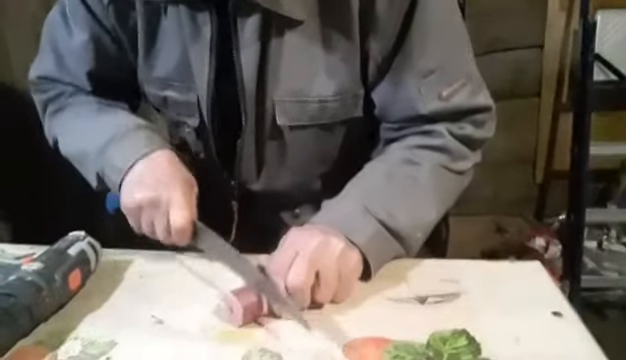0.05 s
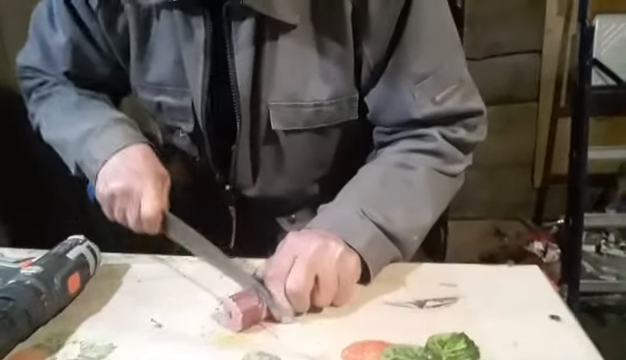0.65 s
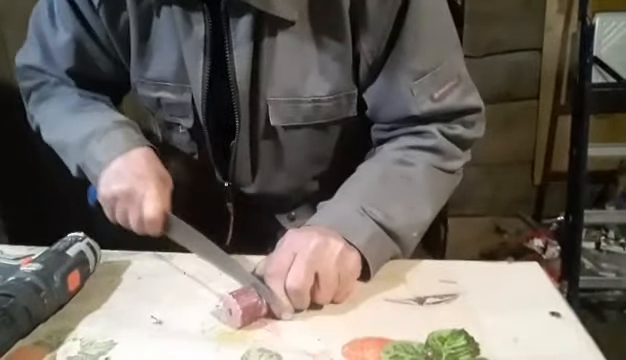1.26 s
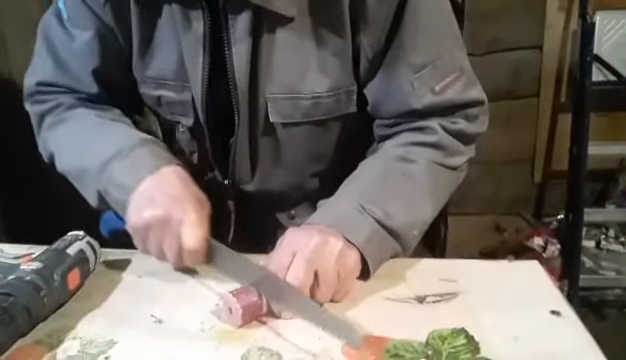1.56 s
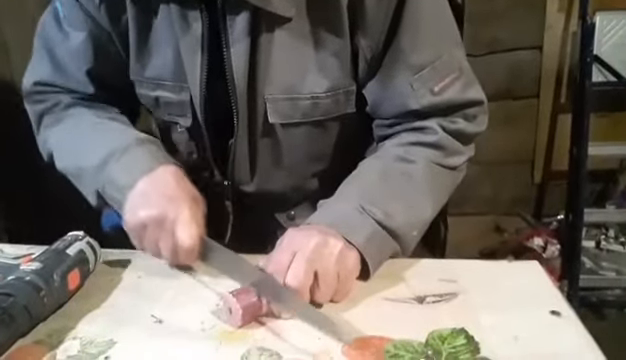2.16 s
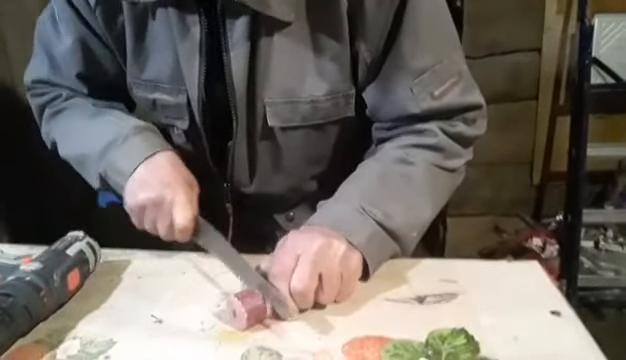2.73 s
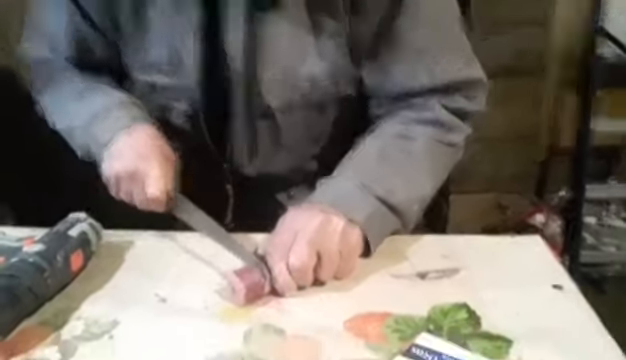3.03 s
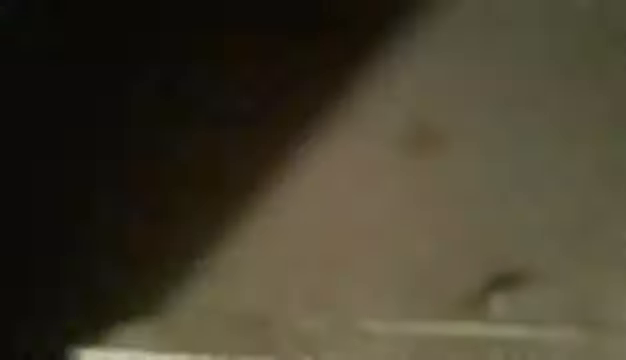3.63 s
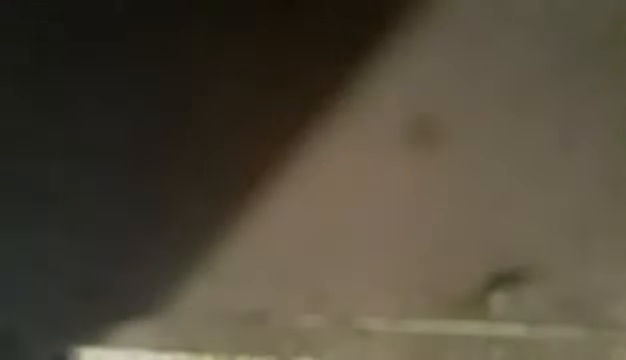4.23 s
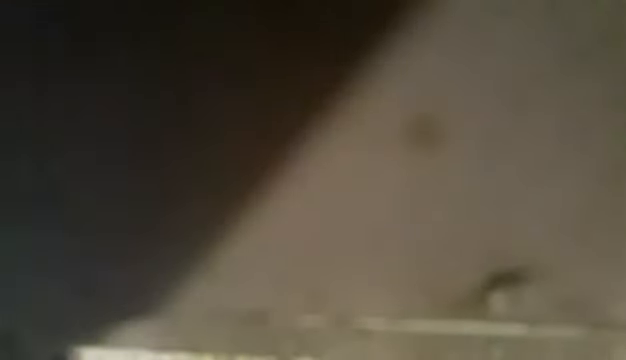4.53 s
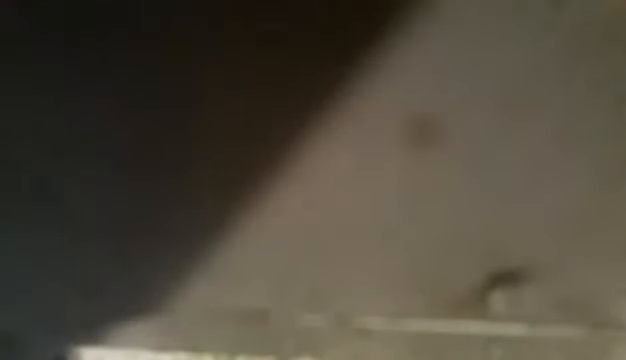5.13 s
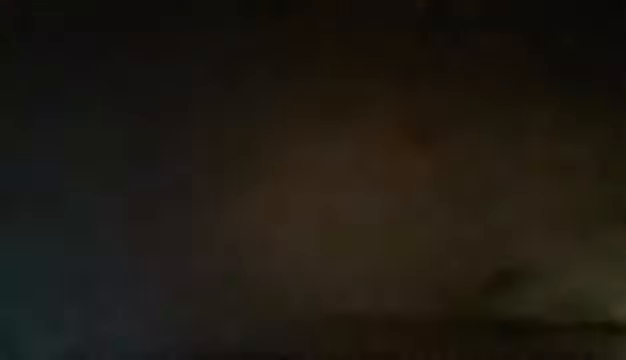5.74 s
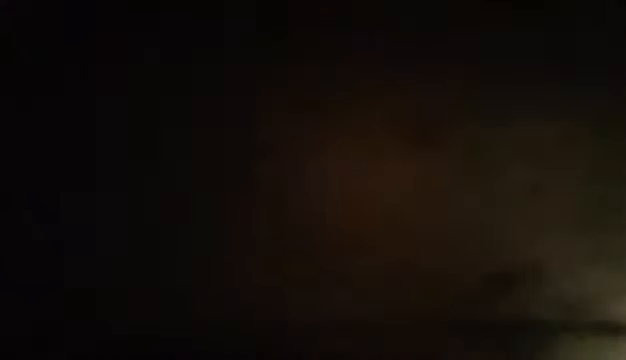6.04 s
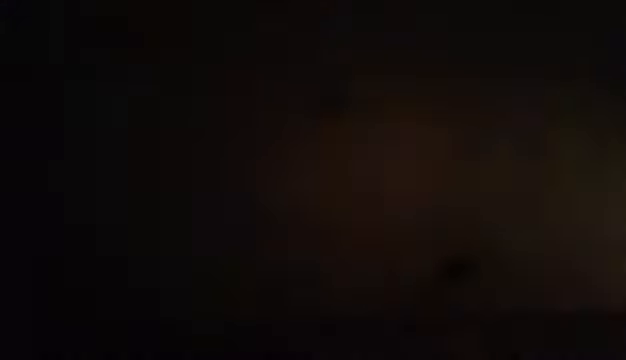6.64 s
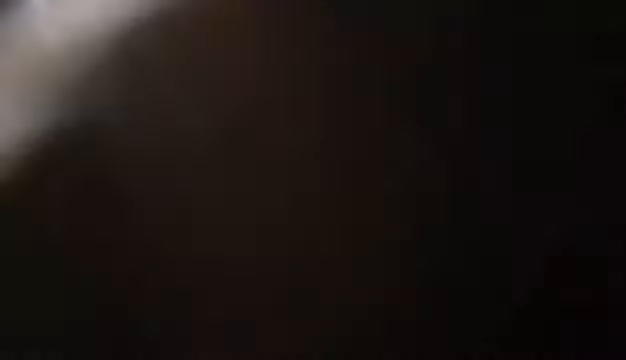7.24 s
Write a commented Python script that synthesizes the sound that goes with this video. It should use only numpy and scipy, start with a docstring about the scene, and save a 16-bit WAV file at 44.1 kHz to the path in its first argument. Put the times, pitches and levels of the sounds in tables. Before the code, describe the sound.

From the start, a serrated knife saws back and forth through a hard, crumbly block on a workbench, about three strokes a second, heard at arm's length in a small shed. Each stroke has a gritty rasp and a thin metallic zing; the pushes drum the bench top, and the blade sometimes snags with a short crunch. The sawing eases near 3 seconds, then gives one more firm stroke. At about 3.7 seconds a phone topples with a loud burst of plastic clacks and wooden thuds right at the microphone, then slides to rest by about 4.3 seconds. A few light taps follow, and a cluster of louder handling knocks comes between 5.1 and 5.7 seconds. From about 6.2 seconds, fingers rub dryly over the case with small bumps and soft sleeve rustle, fading by about 7.4 seconds. The background is very quiet.

```python
"""A workbench in a small shed: a serrated knife saws back and forth through a hard cake of bait.
The teeth crush grit, ring the blade and drum the bench top, hardest on the push. A phone standing on the
bench topples, clatters and slides to rest; then fingers knock and rub on its case as it is picked up.
Sleeves rustle softly over still air."""
import sys
import numpy as np
from scipy import signal
from scipy.fft import rfft, irfft
from scipy.io import wavfile
from scipy.ndimage import uniform_filter1d, map_coordinates

SR = 44100
rng = np.random.default_rng(int(sys.argv[2]) if len(sys.argv) > 2 else 0)


def generate_wav(signal):
    """Clip the signal to [-1, 1] and save it as 16-bit WAV at the path in sys.argv[1]."""
    frames = np.transpose(np.atleast_2d(signal))
    scaled = np.clip(frames, -1, 1) * 32767
    pcm = np.round(scaled).astype(np.int16)
    wavfile.write(sys.argv[1], SR, pcm)


N = 329868
T = np.arange(N) / SR

# Knife strokes, mostly alternating pull and push, with one small resettling move near 3 s:
# (start [s], full-speed tooth rate [Hz], drum level [dB], rasp level [dB],
# bite delay [s], bite half-length [s], bite boost [dB])
STROKES = [(0.102, 218.2, -48.5, -45, 0.058, 0.01, 18.5), (0.184, 281.6, -33, -33.5, 0.25, 0.055, 13),
           (0.522, 277.1, -35.5, -27.5, 0.062, 0.083, 7), (0.867, 278.5, -22.5, -28.5, 0.2, 0.047, 8),
           (1.2, 279.8, -36.5, -28.5, .065, 0.071, 13.5), (1.541, 304.8, -19.5, -28, 0.38, 0.041, -1),
           (1.845, 289, -36, -28.5, .07, .06, 3.5), (2.166, 310.8, -21, -28.5, 0.19, .045, 10.5),
           (2.462, 279.3, -43, -30.5, 0.037, 0.11, 14), (2.806, 279.2, -51, -39, .072, 0.041, 22),
           (3.032, 198.2, -54.5, -60, 0.069, .014, 13.5), (3.141, 218.9, -46, -37.5, .115, 0.012, 8.5),
           (3.329, 314.2, -28.5, -30, 0.27, 0.084, 15.5)]


def blade_motion():
    """The blade speeds up and slows in each stroke; drum and rasp follow its speed and its bite."""
    last_end_s, turn_speed = 3.69, .09  # share of full speed left at the turnaround
    tooth_hz, drum, rasp = np.zeros((3, N))
    ends = [row[0] for row in STROKES[1:]] + [last_end_s]
    for (start, top_hz, drum_db, rasp_db, bite_delay, bite_s, bite_db), end in zip(STROKES, ends):
        now = (T >= start) & (T < end)
        t = T[now] - start
        speed = np.hypot(np.sin(np.pi * t / (end - start)), turn_speed)
        boost_db = bite_db * np.exp(-((t - bite_delay) / bite_s) ** 2)
        tooth_hz[now] = top_hz * speed ** .75
        drum[now] = undb(drum_db + boost_db) * speed ** 1.21
        rasp[now] = undb(rasp_db + 0.39 * boost_db) * speed ** 1.16
    return tooth_hz, drum, rasp


# Body of the bench top under the blade: (pitch [Hz], bandwidth [Hz], gain [dB])
BENCH_MODES = [(301, 46, 0), (417.3, 130, -3), (622, 28, 4.5), (668, 47, 0.5), (748, 26, 0), (837, 9.2, 6),
               (927, 11, 1), (968, 11, 2.5), (1041, 70, -1), (1104, 71, -4.5), (1200, 40, -21.5),
               (1278, 15, -11.5), (1562, 28, -9.5), (1652, 13, -2)]
# Low boom of the rocking bench frame: (pitch [Hz], bandwidth [Hz], gain [dB])
FRAME_MODES = [(145.6, 18, 2), (174, 25, -8)]


def sawing():
    """Teeth drum the bench; each crushes a puff of grit that also rings the blade."""
    tooth_hz, drum, rasp = blade_motion()
    pulses, phase = teeth(tooth_hz, wobble=.04, scatter_db=4.0)
    puffs = 1.1 + np.exp(-phase / 0.16)
    grit = steady(grains(rate=12000, spread_db=1.5) * puffs * undb(0.84 * walk(140)), seconds=0.038)
    dig = np.sqrt(drum / drum.max())  # the harder the push, the more regularly the teeth dig in
    force = 1.3 * dig * pulses + .55 * grit
    bench = drum * steady(band(resonate(force, BENCH_MODES), 210, 1700), seconds=.03)
    rocking = np.sqrt(np.minimum(drum, .06))
    frame = rocking * steady(band(resonate(grit, FRAME_MODES), 76, 390), seconds=0.072)
    saw = undb(-0.5) * bench + undb(3) * blade_rasp(grit, drum, rasp) + undb(-32) * frame + snags(grit)
    return room(saw, t60=0.14, treble_t60=.07, wet_db=-5.5, treble_db=2)


def teeth(tooth_hz, wobble, scatter_db):
    """One pulse per catching tooth, uneven in time and size; returns (pulses, tooth phase)."""
    phase = np.cumsum(tooth_hz * np.exp(wobble * walk(300))) / SR
    sizes = undb(scatter_db * np.clip(rng.standard_normal(N), -2, 2))
    return unit(np.diff(np.floor(phase), prepend=0) * sizes), phase % 1


# EQ of crumbling bait: (frequency [Hz], gain [dB])
BAIT_EQ = [(100, -8), (150, -4.5), (450, -5.5), (700, 8), (1150, 12), (1500, 6.5), (2400, -2), (3100, -4),
           (4400, -4.5), (7300, -6.5), (8300, -14.5), (9500, -20), (11800, -11), (13700, -19), (15500, -15)]
# Zing of the blade: (pitch [Hz], bandwidth [Hz], gain [dB])
BLADE_MODES = [(1723, 39, -0.5), (3180, 20, -9.5), (3106.4, 52, 3), (3770, 150, 3.5), (4430, 240, -4),
               (4745, 77, 1), (5200, 28, 6), (6046, 23, -6.5), (6830, 650, 1.5)]


def blade_rasp(grit, drum, rasp):
    """Grit scrapes the blade, which zings under a light load and crunches under a heavy one."""
    scrape = colour(grit, BAIT_EQ)
    # modes come and go as the contact moves along the blade
    zing = sum(undb(3.5 * walk(16)) * resonate(scrape, [mode]) for mode in BLADE_MODES)
    zing = map_coordinates(zing, [(T + .0014 * walk(14)) * SR], order=3)  # flexing bends the pitch
    crunch = band(scrape, 1830, 3580)
    lightness = rasp / (rasp + .5 * drum + 1e-9)
    scrape = unit(scrape + undb(7.5) * lightness * zing + undb(6) * (1 - lightness) * crunch)
    # a slow blade throws no fine splinters, so the top fades first at each turnaround
    dull = signal.sosfiltfilt(signal.butter(2, 7500, fs=SR, output="sos"), scrape)
    brightness = np.sqrt(np.minimum(rasp / undb(-24.5), 1))
    top = brightness * (scrape - dull) * splinters(rate=50, spread_db=4, rise_s=0.00086)
    return rasp * (dull + top)


def splinters(rate, spread_db, rise_s):
    """Gain that jumps for a few milliseconds whenever a splinter of bait breaks off."""
    t = T[:SR // 20]
    breaks = np.abs(grains(rate, spread_db)) * np.sqrt(rate / SR)
    return 1 + signal.oaconvolve(breaks, t / rise_s * np.exp(1 - t / rise_s))[:N]


# Blade snags, mostly early in a stroke: (time [s], level [dB])
SNAGS = [(0.218, -23), (0.246, -23), (0.939, -38), (1.596, -25), (1.669, -15.5), (2.482, -28.5),
         (2.835, -32), (2.873, -20), (3.164, -39.5), (3.349, -47)]


def snags(grit):
    """The blade catches and breaks free with a short midrange crunch."""
    envelope = sum(undb(db) * np.clip((T - s) / .001, 0, 1) * fade(np.maximum(T - s, 0), 0.059)
                   for s, db in SNAGS)
    crunch = colour(grit, [(200, -12.5), (1100, 21), (2000, 9), (7500, -13), (9000, -16)])
    return envelope * steady(crunch)


# Hits on the phone's case:
# (time [s], thud level [dB], thud centre [Hz], clack level [dB], tick level [dB])
KNOCKS = [(3.674, -11.5, 686, -29, -3), (3.7031, -7, 470, -13, -5), (3.715, -7, 252, -10, -18),
          (3.7354, -7.5, 292.7, -11, -19), (3.755, -14, 602, -21, -13), (3.78, -6, 795, -6, -4.5),
          (3.8255, -19.5, 723, -3, -8), (3.8912, -5, 527, -10, -32), (3.902, -5.5, 606, -10, -30),
          (3.9926, -12, 606, -35, -20), (4.214, -33, 507, -43, -28), (4.442, -21, 303, -44, -40.5),
          (4.827, -24, 381, -37.5, -39), (4.898, -34, 404, -39, -32), (5.087, -18, 736, -12, -30.5),
          (5.225, -8, 600, -42, -22.5), (5.23, -32.5, 700, -10.5, -27), (5.25, -20.5, 597, -39, -27.5),
          (5.389, -18.5, 310, -34, -25), (5.41, -11.5, 514, -13, -23), (5.426, -12.5, 490, -20, -22),
          (5.436, -6.5, 413, -18.5, -38.5), (5.506, -12, 348, -16, -25), (5.583, -11, 505, -20.5, -31),
          (5.698, -5.5, 493, -10.5, -21.5), (5.915, -35.5, 480, -67, -46.5), (6.21, -24, 550, -48, -25),
          (6.2632, -58, 900, -33, -26.5), (6.275, -28, 246, -52, -51), (6.841, -20.5, 710, -39, -31),
          (6.977, -23.5, 303, -62, -31), (7.07, -46, 330, -48, -39), (7.103, -32, 393, -41, -25),
          (7.168, -30.5, 300, -42, -39)]
# Clack of the plastic shell: (pitch [Hz], decay t60 [s], gain [dB])
SHELL_MODES = [(1890, 0.0087, 0.5), (2164, 0.012, -1.5), (2370, 0.0058, 3.5), (2720, 0.012, -3.5),
               (3070, 0.016, -10)]


def knocks():
    """Each blow thuds through the board, clacks the shell and ticks at the point of contact."""
    t = T[:SR // 4]
    mix = np.zeros(N + SR)
    for s, thud_db, centre_hz, clack_db, tick_db in KNOCKS:
        clack = peak(band(ring(SHELL_MODES, scatter_db=3, rise_s=.0005), 1400, 3500))
        envelope = (fade(t, 0.017) + undb(-14.5) * fade(t, 0.13)) * (1 - np.exp(-t / 0.0009))
        # a blow that is mostly thud comes from something soft and has little top
        top_db = -16.5 - 0.61 * np.clip(thud_db - tick_db, 0, 20)
        tick_eq = [(100, -26), (1200, 2.5), (3500, 7), (7200, 4), (9000, top_db), (15000, top_db)]
        tick = colour(rng.standard_normal(len(t)) * envelope, tick_eq, size=512)
        tick /= 3 * np.std(tick[:SR // 200])  # transient peaks near 1
        body = peak(thud(centre_hz, octaves=0.84))
        start = int(s * SR)
        mix[start:start + len(t)] += undb(thud_db) * body + undb(clack_db) * clack + undb(tick_db) * tick
    return mix[:N]


# Body of the board with the phone on it: (pitch [Hz], decay t60 [s], gain [dB])
BOARD_MODES = [(169, 0.14, -11.5), (261, .06, -10), (323.7, 0.039, 3.5), (432, 0.055, -3),
               (518, 0.046, -1.5), (567, 0.043, 0), (725, 0.038, -1), (831.5, 0.065, -5.5), (962, 0.06, -1),
               (1100, 0.031, -3.5)]


def thud(centre_hz, octaves):
    """A wooden thud in which the board modes near the centre ring most."""
    modes = [(hz, t60, db - 6 * (np.log2(hz / centre_hz) / octaves) ** 2) for hz, t60, db in BOARD_MODES]
    return band(ring(modes, scatter_db=4.5, rise_s=0.0006), 110, 1600)


# The phone skids on the bench: (time [s], level [dB], hold [s], decay t60 [s])
SKIDS = [(3.674, -10, 0.015, 0.079), (3.706, -15, 0.016, 0.033), (3.734, -12, 0.0067, 0.02),
         (3.747, -16, .026, 0.011), (3.781, -14.5, 0.0049, 0.025), (3.792, -14, 0.025, 0.01),
         (3.8257, -14, .004, 0.12), (3.893, -14.5, 0.0028, 0.18), (5.413, -43.5, 0.032, 0.23),
         (5.487, -35, 0.014, 0.21), (6.9, -34, 0.01, 0.084)]
# EQ of the chattering case: (frequency [Hz], gain [dB])
SKID_EQ = [(40, -36), (130, -2.5), (850, -5.5), (1300, -5.5), (2200, -12.5), (6900, -9), (8900, -31),
           (11500, -26), (15500, -24)]


def skids():
    """The case chatters over the board for an instant at each contact."""
    force = sum(undb(db) * (T >= s) * fade(np.maximum(T - s - hold, 0), t60)
                for s, db, hold, t60 in SKIDS)
    chatter = grains(rate=9000, spread_db=-1.5) * undb(2 * walk(350))
    return force * colour(chatter, SKID_EQ)


# The fallen phone slides: (time [s], hold [s], decay t60 [s], rumble level [dB], hiss level [dB])
SLIDES = [(3.968, 0.049, 0.39, -37.5, -23.5), (4.16, 0.051, .24, -44, -47.5)]
# Ring of the case scraped on its edge: (pitch [Hz], bandwidth [Hz], gain [dB])
EDGE_MODES = [(2823, 160, 15.5), (4630, 400, -2), (5500, 310, 8.5)]


def sliding():
    """The edge of the case scrapes along and the board groans under it."""
    rumble, hiss = drag(SLIDES, EDGE_MODES, crackle=.1)
    groan = undb(-1) * band(rumble, 270, 920)
    return rumble + groan + hiss


# Finger rubs: (time [s], hold [s], decay t60 [s], rumble level [dB], hiss level [dB])
RUBS = [(4.845, 0.098, 0.16, -58.5, -52.5), (6.228, 0.0057, .015, -42.5, -35.5),
        (6.295, 0.042, 0.28, -57, -49), (6.365, 0.0094, .06, -45, -49), (6.407, 0.0093, .1, -44, -46),
        (6.43, 0.27, 0.51, -46.5, -42.5), (6.615, 0.067, 0.16, -40, -33.5), (6.74, 0.09, 1, -46, -40.5),
        (6.84, .02, 0.095, -28, -25.5), (6.905, 0.018, 0.27, -48, -29.5), (6.99, .16, 1, -46.5, -39.5),
        (7.32, 0.034, 0.82, -61, -51), (7.455, .025, .2, -68, -49)]
# Ring of the case under the fingers: (pitch [Hz], bandwidth [Hz], gain [dB])
CASE_MODES = [(1960, 310, -1), (4420, 550, 0), (5360, 4500, -10.5)]


def rubbing():
    """Dry skin drags over the case and catches now and then with a tiny crackle."""
    rumble, hiss = drag(RUBS, CASE_MODES, crackle=0.35)
    return undb(3) * rumble + undb(-1.5) * hiss


# EQ of the low friction layer: (frequency [Hz], gain [dB])
RUMBLE_EQ = [(40, -29), (100, -4.5), (180, -2), (350, -0.5), (1000, -9), (1800, -21.5), (4000, -81)]
# EQ of the high friction layer: (frequency [Hz], gain [dB])
HISS_EQ = [(300, -24), (900, 1.5), (2000, 0.5), (2900, -5), (4500, 0), (7400, 2), (8900, -20),
           (12500, -10.5), (15500, -15)]


def drag(events, modes, crackle):
    """Small sticks and slips on the case, as (rumble, hiss); its ring comes and goes with the grip."""
    rumble_gain, hiss_gain = swells(events)
    slips = undb(2.4 * walk(70))
    rumble = colour(grains(rate=900, spread_db=2.5), RUMBLE_EQ) * undb(2 * walk(23))
    hiss = colour(grains(rate=12000, spread_db=3.5) + crackle * grains(rate=100, spread_db=2), HISS_EQ)
    ringing = sum(undb(-4.5 + 3.3 * walk(10)) * resonate(hiss, [mode]) for mode in modes)
    return slips * rumble_gain * rumble, slips * hiss_gain * unit(hiss + ringing)


# Sleeve moves: (time [s], hold [s], decay t60 [s], level [dB])
SLEEVE_MOVES = [(0, 4.55, 0.17, -64.5), (4.755, 0.68, .4, -71), (5.33, 0.23, 0.82, -47.5),
                (5.9, 0.327, .6, -63), (6.25, 1.4, .6, -57)]
# EQ of the cloth: (frequency [Hz], gain [dB])
CLOTH_EQ = [(40, -42.5), (230, -11), (800, -17), (1400, -22.5), (4200, -25.5), (7300, -28), (9000, -48.5),
            (15500, -48)]


def sleeves():
    """Cloth fibres brush together in a soft rustle, with a stray tick now and then."""
    fibres = grains(rate=29000, spread_db=3) * undb(4.7 * walk(43))
    ticks = undb(-3.5) * grains(rate=22, spread_db=1.6)
    return swells(SLEEVE_MOVES)[0] * colour(fibres + ticks, CLOTH_EQ)


# EQ of the room tone: (frequency [Hz], gain [dB])
AIR_EQ = [(30, -14), (150, -2), (350, -13), (1500, -19), (6000, -11), (9000, -23)]


def room_tone():
    """The still air of the shed, a faint steady noise bed."""
    return undb(-74.5) * colour(rng.standard_normal(N), AIR_EQ)


def room(x, t60, treble_t60, wet_db, treble_db):
    """Add the short, dense echo of wooden walls; the treble has its own decay."""
    t = T[:SR // 2]
    noise = rng.standard_normal(len(t)) * np.minimum(t / 0.0011, 1)
    low = signal.sosfilt(signal.butter(2, 1200, fs=SR, output="sos"), noise)
    tail = low * fade(t, t60) + undb(treble_db) * (noise - low) * fade(t, treble_t60)
    return x + undb(wet_db) * signal.oaconvolve(x, tail / np.linalg.norm(fade(t, t60)))[:N]


def ring(modes, scatter_db, rise_s):
    """One blow on modes (Hz, t60, dB); where it lands sets their shares, and they swell with contact."""
    t = T[:SR // 4]
    tone = 0
    for (hz, t60, db), (share, detune, lag) in zip(modes, rng.standard_normal((len(modes), 3))):
        phase = 2 * np.pi * hz * (1 + 0.018 * detune) * t + .5 * lag
        tone += undb(db + scatter_db * share) * fade(t, t60) * np.sin(phase)
    return tone * (1 - np.exp(-t / rise_s))


def swells(rows):
    """Envelopes that swell, hold and fade for rows (time, hold, t60, levels); one per level column."""
    power, rise_s = 0, 0.00365
    for s, hold, t60, *levels_db in rows:
        shape = np.exp(np.minimum(T - s, 0) / rise_s) * fade(np.maximum(T - s - hold, 0), t60)
        power = power + np.outer(undb(levels_db), shape) ** 2
    return np.sqrt(power)


def grains(rate, spread_db):
    """Tiny clicks of uneven size at random moments, about rate a second."""
    sizes = undb(spread_db * np.minimum(rng.exponential(size=N), 5))
    return unit((rng.random(N) < rate / SR) * sizes * rng.choice([-1, 1], N))


def walk(rate):
    """Random modulation that glides to a new value rate times a second."""
    return np.interp(T * rate, np.arange(16384), rng.standard_normal(16384))


def colour(x, points, size=4096):
    """Minimum-phase EQ through (Hz, dB) points, of unit energy."""
    hz, db = np.transpose(points)
    f = np.maximum(np.fft.rfftfreq(size, 1 / SR), 1)
    cepstrum = irfft(np.log(undb(np.interp(np.log(f), np.log(hz), db))))
    cepstrum[1:size // 2] *= 2
    cepstrum[size // 2 + 1:] = 0
    response = irfft(np.exp(rfft(cepstrum)))
    return signal.oaconvolve(x, response / np.linalg.norm(response))[:len(x)]


def resonate(x, modes):
    """Parallel resonances (Hz, bandwidth, dB)."""
    return sum(undb(db) * signal.lfilter(*signal.iirpeak(hz, hz / width, fs=SR), x)
               for hz, width, db in modes)


def band(x, low_hz, high_hz):
    """Band-pass with steep skirts."""
    return signal.sosfilt(signal.butter(3, [low_hz, high_hz], "band", fs=SR, output="sos"), x)


def steady(x, seconds=0.039):
    """Ride the level to rms 1, keeping the quick grain."""
    return x / np.sqrt(uniform_filter1d(x ** 2, int(seconds * SR)) + 1e-12)


def fade(t, t60):
    """Exponential decay, 60 dB down after t60."""
    return np.exp(-np.log(1000) * t / t60)


def undb(db):
    """Decibels to gain."""
    return 10 ** (np.asarray(db) / 20)


def unit(x):
    """Scale to rms 1."""
    return x / np.sqrt(np.mean(x ** 2))


def peak(x):
    """Scale to peak 1."""
    return x / np.abs(x).max()


def scene():
    """Sawing at arm's length, handling right at the microphone."""
    handling = room(knocks() + skids(), t60=0.19, treble_t60=0.21, wet_db=-8.5, treble_db=-5.5)
    return (sawing() + handling + sliding() + rubbing() + sleeves() + room_tone())[None]


def record(dry):
    """The microphone drops the deep bass, clips the hardest blows and cuts the top."""
    x = signal.sosfilt(signal.butter(2, 60, "high", fs=SR, output="sos"), dry)
    x = x / (1 + x ** 10) ** .1
    return signal.sosfilt(signal.ellip(8, .2, 70, 15700, fs=SR, output="sos"), x)


dry = scene()
out = record(dry)
generate_wav(out)
```